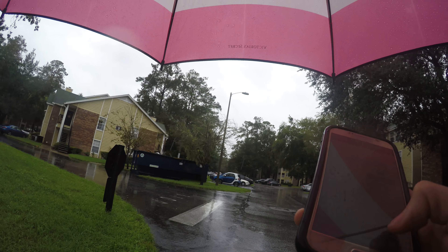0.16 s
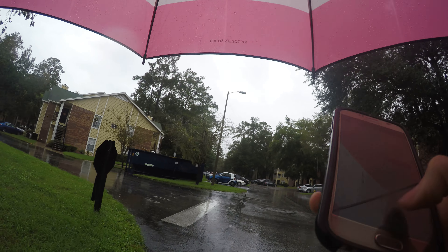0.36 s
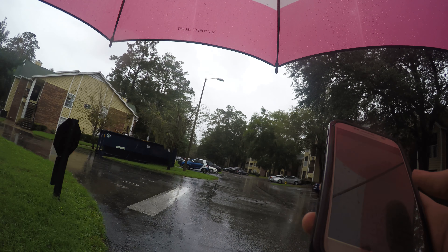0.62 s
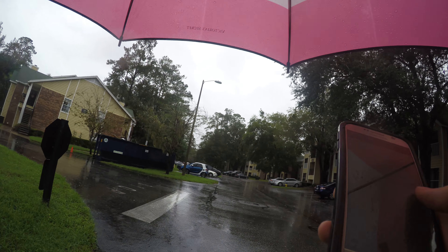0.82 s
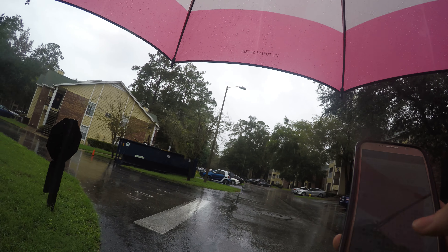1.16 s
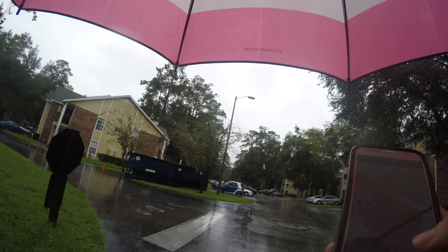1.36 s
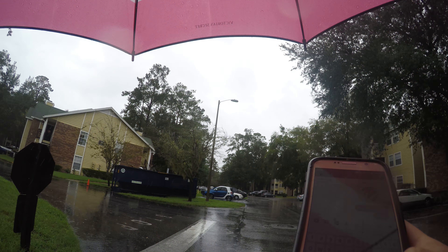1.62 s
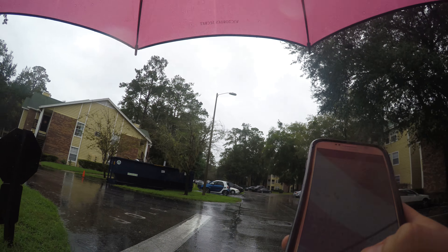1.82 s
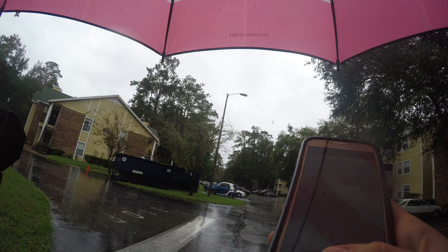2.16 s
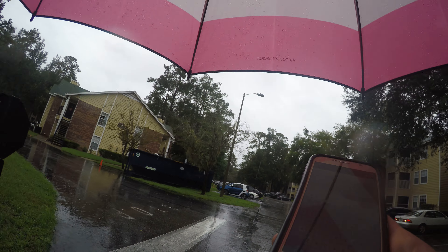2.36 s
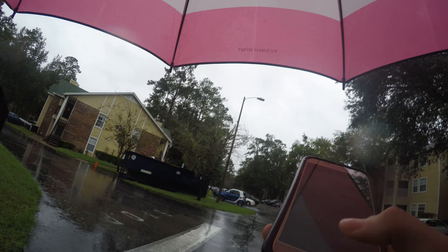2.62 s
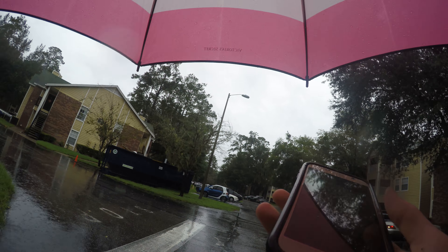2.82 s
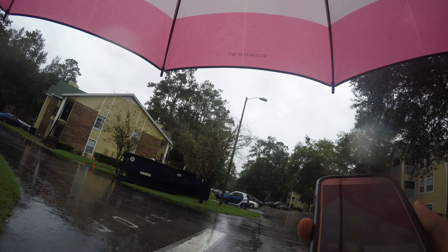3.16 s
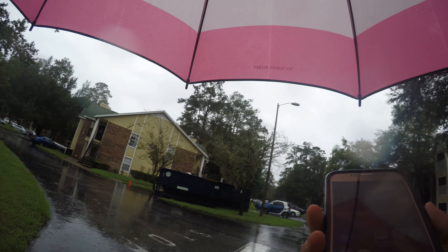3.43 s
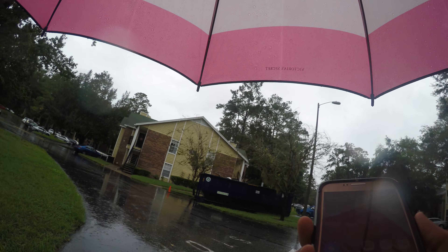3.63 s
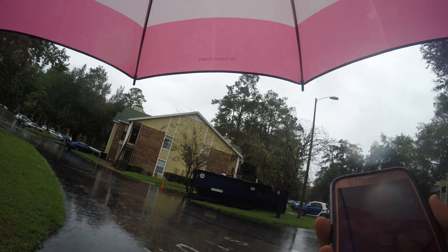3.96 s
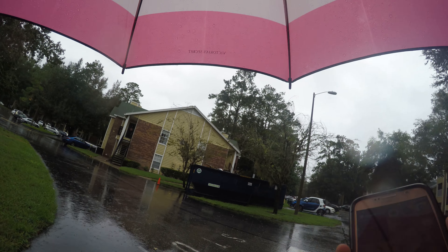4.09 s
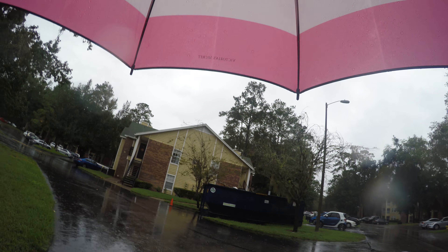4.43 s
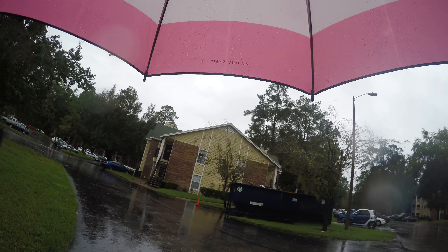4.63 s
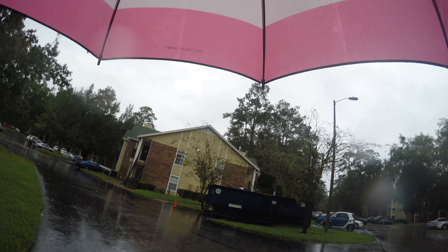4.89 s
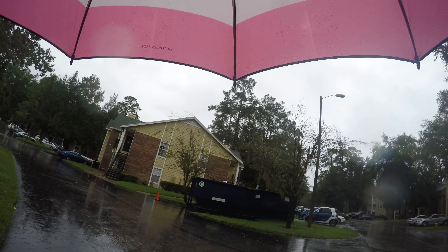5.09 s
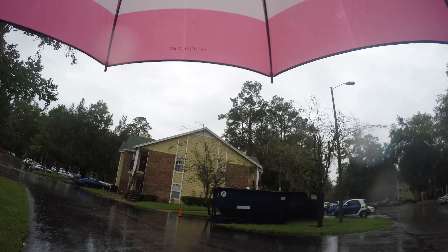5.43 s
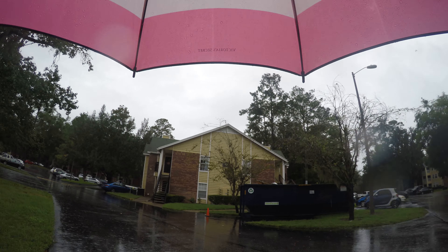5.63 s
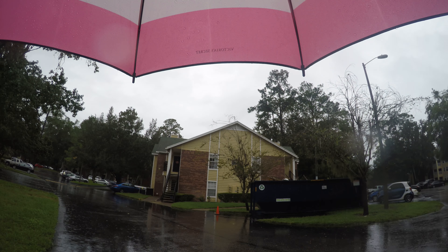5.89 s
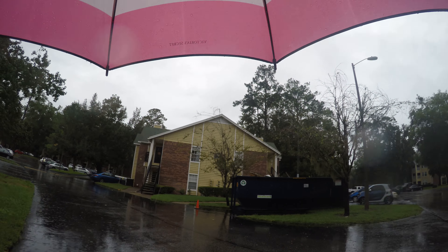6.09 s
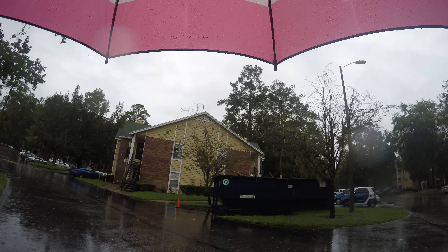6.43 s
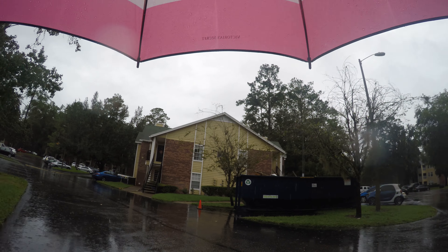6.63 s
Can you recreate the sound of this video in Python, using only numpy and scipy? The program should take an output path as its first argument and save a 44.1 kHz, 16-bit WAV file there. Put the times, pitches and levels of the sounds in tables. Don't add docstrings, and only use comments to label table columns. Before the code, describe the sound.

Raindrops tap irregularly on a taut umbrella overhead, over soft rain hiss and low wind buffeting, with hand rubbing and one loud plastic snap near the end.

```python
import sys
import numpy as np
from scipy import signal
from scipy.fft import rfft, irfft, next_fast_len
from scipy.io import wavfile
from scipy.ndimage import map_coordinates

SR = 44100
rng = np.random.default_rng(int(sys.argv[2]) if len(sys.argv) > 2 else 0)


def wrap_up_sound(samples):
    columns = np.atleast_2d(samples).T
    tamed = np.clip(columns, -1, 1)
    steps = np.round(tamed * 32767).astype(np.int16)
    wavfile.write(sys.argv[1], SR, steps)


def how_loud(loudness_db):
    steps = np.asarray(loudness_db, float) / 20
    return 10 ** steps


N = 298116


def unit(x):
    return x / np.sqrt(np.mean(x ** 2) + 1e-20)


def curves(rows):
    s, *cols = np.transpose(rows)
    return [np.interp(np.arange(N) / SR, s, c) for c in cols]


def wobble(rate_hz):
    knots = rng.standard_normal(int(N * rate_hz / SR) + 4)
    return map_coordinates(knots, [np.arange(N) * rate_hz / SR])


def filtered(x, response):
    m = next_fast_len(N + SR // 2)
    return irfft(rfft(x, m) * response(np.fft.rfftfreq(m, 1 / SR)), m)[:N]


def modal(modes):
    def response(f):
        total = 0
        for k, (centre, width, db) in enumerate(modes):
            damping = 1j * f * width
            total = total + (-1) ** k * how_loud(db) * damping / (centre * centre - f * f + damping)
        return total
    return response


def resonate(x, modes):
    return filtered(x, modal(modes))


def noise(spectrum):
    f, db = np.transpose(spectrum)
    white = rng.standard_normal(N)
    return unit(filtered(white, lambda hz: how_loud(np.interp(np.log(hz + 1), np.log(f + 1), db))))


def bursts(times, gains, shapes):
    at = np.round(times * SR).astype(int)[:, None] + np.arange(shapes.shape[1])
    return np.bincount(at.ravel(), (gains[:, None] * shapes).ravel(), N + SR)[:N]


# centre [Hz], width [Hz], level [dB]
DRUM_MODES = [(1092, 167, 7), (324, 396, -8.5)]
# centre [Hz], width [Hz], level [dB]
CAVITY_MODES = [(1494, 390, -4.5), (2330, 190, 7.5), (2730, 264, 2.5)]
# centre [Hz], width [Hz], level [dB]
SPLASH_MODES = [(3220, 200, -2.5), (3883, 253, 8), (4630, 470, -4.5), (5810, 720, -5.5),
                (7560, 1900, -15.5)]


def impacts(start_s, drum_db, cavity_db, splash_db, t60):
    size = 640
    t, hz = np.arange(384) / SR, np.fft.rfftfreq(size, 1 / SR)
    draw = rng.standard_normal((len(start_s), len(t) + 2))
    life = t60 * np.exp(0.75 * draw[:, :1])
    detune = np.exp(0.048 * draw[:, 1:2])
    decay = how_loud(-60 * t / .004) + .3 * how_loud(-60 * t / life)
    rise = 1 - np.exp(-t / .0001)
    taps = rfft(draw[:, 2:] * decay * rise, size)
    dull = 1 / (1 + 1j * hz / 9000)
    shapes = 0
    for modes, db in [(DRUM_MODES, drum_db), (CAVITY_MODES, cavity_db), (SPLASH_MODES, splash_db)]:
        ring = irfft(taps * dull * modal(modes)(hz * detune))
        shapes = shapes + how_loud(db)[:, None] * ring / np.linalg.norm(ring, axis=1, keepdims=True)
    return bursts(start_s, np.ones(len(start_s)), shapes)


# start_s [s], drum_db [dB], cavity_db [dB], splash_db [dB]
LARGE_DROPS = [(0.0464, -19.5, -13.5, -20.5), (0.2137, -19, -12.5, -28), (0.604, -38, -16, -24),
               (1.2517, -16.5, -13, -34), (1.443, -15, -15, -26), (2.0119, -19, -20, -22),
               (2.0204, -16, -19, -26), (2.154, -16, -20, -23.5), (2.2281, -16.5, -23, -17),
               (2.3882, -11.5, -11.5, -24), (2.9156, -12, -16, -24), (2.9879, -17, -15, -22),
               (3.0375, -18, -14, -29), (3.1484, -17, -19, -34), (3.2976, -12.5, -19, -19.5),
               (3.3186, -20, -17, -32), (3.5274, -15, -16.5, -33), (3.7978, -14, -14, -33),
               (3.915, -15, -27, -22.5), (4.2716, -17.5, -18, -25), (4.299, -14.5, -24, -21),
               (4.3609, -20, -16, -28), (4.4244, -20, -15, -29), (4.6014, -19, -13, -37),
               (4.839, -42, -12, -27), (4.8999, -19, -1.5, -27), (4.946, -21, -10.5, -24),
               (5.026, -16, -11.5, -26), (5.4084, -19, -3, -25), (6.6, -14, -13, -29)]
# start_s [s], strength_db [dB]
PANEL_DROPS = [(.0702, -23), (.356, -13), (.4711, -12), (.758, -13.5), (.9532, -14), (1.2459, -13.5),
               (1.5315, -15.5), (1.561, -16), (1.9038, -17), (1.9642, -13), (2.0634, -19.5),
               (2.2798, -17.5), (2.4665, -18), (3.0074, -25), (3.16, -14), (3.1832, -16), (3.326, -16.5),
               (3.4217, -15.5), (3.735, -16), (4.003, -15.5), (4.487, -16.5), (4.6178, -14.5),
               (5.088, -14.5), (6.2391, -17), (6.3372, -17), (6.3803, -12), (6.4757, -14.5), (6.6476, -14),
               (6.6729, -18), (6.7044, -17)]
# start_s [s], strength_db [dB]
RIB_DROPS = [(.6192, -21), (.626, -18.5), (.7132, -22), (1.0339, -16.5), (1.2639, -20), (1.3101, -19),
             (1.404, -22), (1.8166, -16.5), (2.1417, -20), (2.621, -18), (2.7509, -19.5), (2.7962, -23),
             (3.0613, -17), (3.1005, -15.5), (3.1184, -17), (3.465, -18), (3.7282, -20.5), (3.8794, -22),
             (3.8931, -16), (4.0584, -18), (4.0844, -18), (4.2566, -16), (4.4526, -22), (4.5345, -20),
             (4.558, -16), (4.891, -20.5), (5.0199, -24), (5.3211, -21.5), (5.542, -21), (6.5881, -19)]
# start_s [s], strength_db [dB]
RIM_DROPS = [(.685, -22.5), (.7215, -20.5), (.941, -26.5), (1.329, -20), (1.5077, -26), (1.6558, -21.5),
             (1.722, -25), (2.054, -21), (2.107, -21.5), (2.4324, -26), (2.5133, -24), (2.5929, -21),
             (2.6631, -25), (2.9573, -24), (3.133, -19), (3.514, -20.5), (3.6714, -26), (3.9382, -22),
             (3.974, -19.5), (4.0326, -20), (4.0971, -19), (4.1837, -22.5), (4.288, -28), (4.43, -19.5),
             (4.6403, -20), (5.3565, -25), (6.0371, -21.5), (6.176, -21.5), (6.4986, -20), (6.7195, -19.5)]
# start_s [s], strength_db [dB]
SMALL_DROPS = [(.0604, -17.5), (.4032, -27), (.487, -21), (.7504, -19), (.8191, -21), (.8658, -20),
               (.888, -22), (1.1545, -28), (1.2308, -21), (1.3543, -26), (1.4128, -23), (1.4883, -19),
               (1.6466, -27), (1.691, -23), (1.8742, -18.5), (2.0958, -20.5), (2.2716, -17.5),
               (2.3985, -20.5), (2.8208, -26), (3.1137, -17), (3.6066, -22), (3.6466, -17), (3.6957, -19),
               (3.7511, -23.5), (3.9944, -19), (4.2641, -21), (4.5121, -23), (5.491, -26), (6.5304, -21.5),
               (6.6247, -18)]


def drops():
    # drum, cavity and splash dB over the strength
    places = [(PANEL_DROPS, (-2.5, -8, -13)), (RIB_DROPS, (-3.5, 0.5, -10.5)),
              (RIM_DROPS, (-1, 1, -1)), (SMALL_DROPS, (-1.5, -1, -9))]
    usual = np.array([(s, *np.add(db, colour)) for rows, colour in places for s, db in rows])
    usual[:, 1:] += 2.5 * rng.standard_normal((len(usual), 3))
    start_s, drum_db, cavity_db, splash_db = np.vstack([LARGE_DROPS, usual]).T
    return impacts(start_s - .0004, drum_db - 3.5, cavity_db - 7.0, splash_db - 4.5, t60=0.015)


# start_s [s], level_db [dB]
PATTER_LEVEL = [(0.0, -54.5), (0.96, -54.5), (2.01, -52.5), (2.7, -59), (3.12, -51.5), (3.86, -53),
                (5.25, -52.5), (5.6, -51), (5.95, -45.5), (6.14, -61), (6.34, -59.5), (6.76, -52)]


def patter():
    draw = rng.random((1300, 5))
    place = draw[:, 0] * N
    cluster_db = 3.2 * wobble(16)[place.astype(int)]
    size_db = np.minimum(-4.5 * np.log(draw[:, 1]), 9) + cluster_db
    drum_db, cavity_db, splash_db = size_db + 14 * (draw[:, 2:].T - .5)
    fine = impacts(place / SR, drum_db - .5, cavity_db, splash_db - 5.0, t60=0.026)
    return how_loud(curves(PATTER_LEVEL)[0] - 1.0) * unit(fine)


# start_s [s], level_db [dB], pitch_hz [Hz], width_hz [Hz]
SHELL_PINGS = [
    (.604, -26, 2700, 300),
    (1.4427, -26, 3300, 400),
    (1.781, -41, 10600, 1200),
    (4.4244, -39, 7200, 1500),
    (5.7487, -16, 9700, 1600),
]


def pings():
    puffs = rng.standard_normal((len(SHELL_PINGS), 256)) * how_loud(-60 * np.arange(256) / SR / 0.0075)
    total = 0
    for (start_s, level_db, pitch_hz, width_hz), puff in zip(SHELL_PINGS, puffs):
        tap = bursts(np.array([start_s]), how_loud([level_db]), puff[None])
        total = total + resonate(tap, [(pitch_hz, width_hz, 0)])
    return total


def strokes(rows, swell):
    power = np.zeros(N + SR)
    for start_s, length_s, level_db in rows:
        phase = np.linspace(0, 1, round(length_s * SR)) ** 0.66
        arch = np.abs(np.sin(np.pi * phase))
        power[round(start_s * SR):][:len(arch)] += (arch ** swell * how_loud(level_db)) ** 2
    return np.sqrt(power[:N])


# start_s [s], length_s [s], pressure_db [dB], edge_db [dB over the pressure]
HAND_STROKES = [(4.833, 0.022, -51, 1), (4.894, 0.042, -35, -10), (4.94, 0.038, -49, -11),
                (5.405, 0.023, -44.5, -9.5), (5.438, 0.055, -41, -16.5), (5.536, .045, -46, -15.5),
                (5.582, 0.075, -42, -16), (5.615, .06, -36.5, -12.5), (5.657, 0.061, -37, -16.5),
                (5.69, 0.055, -43, -18), (5.717, 0.081, -29, -11.5), (5.73, 0.11, -32, -8.5),
                (5.838, 0.13, -32.5, -9.5), (5.898, 0.073, -34, -20), (5.922, 0.088, -34, -14)]
# start_s [s], length_s [s], pressure_db [dB]
FINGER_STROKES = [
    (3.795, 0.029, -43),
    (3.81, 0.053, -37),
]
# centre [Hz], width [Hz], level [dB]
SHELL_LOW = [(1360, 560, -8.5), (1798, 107, 3), (2245, 250, 0), (2770, 286, -1)]
# centre [Hz], width [Hz], level [dB]
SHELL_HIGH = [(3620, 430, 4), (4690, 300, 8), (5690, 300, 5), (6530, 480, 0), (8600, 950, -5.5),
              (13700, 4000, -20)]
# centre [Hz], width [Hz], level [dB]
SQUEAK_MODES = [(1980, 250, 7.5), (2960, 530, -5), (3800, 320, -5), (5820, 240, -8.5), (6500, 900, -26),
                (7300, 330, -21)]


def rubs():
    grain = rng.standard_normal(N) * how_loud(2.14 * wobble(500) + 0.56 * wobble(120))
    low = unit(resonate(resonate(grain, SHELL_LOW), [(2330, 2500, 0)]))
    high = unit(resonate(grain, SHELL_HIGH))
    squeak = unit(resonate(resonate(grain, SQUEAK_MODES), [(3000, 6000, 0)]))
    body = strokes([(s, length, db) for s, length, db, edge_db in HAND_STROKES], swell=1)
    edge = strokes([(s, length, db + edge_db + 2.0) for s, length, db, edge_db in HAND_STROKES], swell=2.4)
    return body * low + edge * high + strokes(FINGER_STROKES, swell=1) * squeak


# start_s [s], level_db [dB], crack_db [dB]
CATCH_BLOWS = [
    (6.0731, 4, 2.5),
    (6.0837, -21, -32),
    (6.0884, -21.5, -25.5),
    (6.8, -27, -12),
]
# centre [Hz], width [Hz], level [dB]
CLICK_MODES = [(1410, 170, -13.5), (1778, 113, -7.5), (2190, 112, -1.5), (2500, 276, -2.5), (2825, 240, -5),
               (3390, 350, -9), (3950, 150, -15), (5373, 300, -12.5)]
# pitch_hz [Hz], level_db [dB], t60_s [s]
CATCH_RING = [(1633, -0.5, 0.041), (1910, -15, 0.092), (2098, -4.5, 0.13), (2240, -8.5, 0.1),
              (2500, -14.5, 0.052), (4300, -24.5, .05)]
# centre [Hz], width [Hz], level [dB]
CRACK_MODES = [(4500, 1500, 1), (8200, 3000, -9.5), (10600, 1700, -9.5), (14300, 2500, -13)]


def catch():
    t = np.arange(SR // 4) / SR
    start_s, level_db, crack_db = np.transpose(CATCH_BLOWS)
    blow = np.hanning(9)[None]
    click = resonate(bursts(start_s, how_loud(level_db + 27), blow), CLICK_MODES)
    ring = sum(how_loud(db - 19.5 - 60 * t / t60) * np.sin(2 * np.pi * hz * t) for hz, db, t60 in CATCH_RING)
    rings = bursts(start_s, how_loud(level_db), ring[None])
    puff = rng.standard_normal((len(start_s), len(t))) * how_loud(crack_db[:, None] - 4.0 - 60 * t / 0.006)
    crack = resonate(bursts(start_s, how_loud(level_db), puff), CRACK_MODES)
    return filtered(click + rings + crack, lambda hz: 1j * hz / (1200 + 1j * hz))


# start_s [s], peak_db [dB], pitch_hz [Hz], puff_db [dB]
KNOCKS = [(0.4627, -29, 140, -10), (2.387, -44, 120, -5), (2.914, -44, 120, -7), (3.299, -40, 100, -1.5),
          (3.32, -30, 39.5, -16), (3.8003, -24, 74.6, -26), (4.897, -34, 90, -6), (5.113, -29.5, 48.5, -6),
          (5.408, -32.5, 70, -17), (5.615, -32.5, 45, -30), (5.732, -27.5, 59, -12)]


def bumps():
    start_s, peak_db, pitch_hz, puff_db = np.transpose(KNOCKS)
    t, hz = np.arange(2048) / SR, pitch_hz[:, None]
    swing = -np.sin(2 * np.pi * hz * t) * how_loud(-60 * t * hz / 2.6) * (1 - np.exp(-t / 0.00054))
    puff = rng.standard_normal(swing.shape) * how_loud(-60 * t / 0.032)
    puffs = bursts(start_s, how_loud(peak_db + puff_db + 24.5), puff)
    dull = resonate(resonate(puffs, [(323, 360, 0)]), [(317, 260, 0)])
    return bursts(start_s, how_loud(peak_db + 10.5), swing) + dull


# start_s [s], level_db [dB]
GUSTS = [(0.0, -28), (0.09, -47), (0.43, -36.5), (0.75, -42.5), (1.0, -32.5), (1.07, -42), (2.14, -39.5),
         (2.48, -51.5), (2.73, -37.5), (3.01, -43), (3.41, -37.5), (3.69, -49), (3.85, -39), (4.63, -43.5),
         (5.35, -41.5), (5.74, -31.5), (6.19, -45.5), (6.76, -40.5)]
# pitch_hz [Hz], level [dB per Hz]
BUFFET_SPECTRUM = [(8.8, -39), (15, 5.5), (34, -5), (45, -4), (81, -19), (120, -21.5), (160, -36),
                   (260, -120)]
# pitch_hz [Hz], level [dB per Hz]
FLUTTER_SPECTRUM = [(35, -18.5), (60, -2), (81, -4.5), (198, -9), (228, -9.5), (497, -24.5), (800, -47.5),
                    (1040, -66), (1760, -120)]


def wind():
    gust_db, = curves(GUSTS)
    buffet = unit(how_loud(1.5 * wobble(20)) * noise(BUFFET_SPECTRUM)) * how_loud(2.0)
    flutter = unit(how_loud(3.3 * wobble(40) + 0.76 * wobble(4.1)) * noise(FLUTTER_SPECTRUM))
    flutter_db = -50.5 + 0.28 * (gust_db - gust_db.mean())
    return how_loud(gust_db) * buffet + how_loud(flutter_db) * flutter


# pitch_hz [Hz], level [dB per Hz]
RAIN_SPECTRUM = [(240, -38), (400, -8), (745, -9), (1100, -1), (1970, -11), (2290, -2), (3010, -12),
                 (3890, -10), (4960, -20), (8060, -28), (15000, -33)]
# pitch_hz [Hz], level [dB per Hz]
MICROPHONE_SPECTRUM = [(2000, -12), (5000, 0), (8000, -3), (15000, -7)]


def far_rain():
    road = how_loud(-55.0 - 5.0 + 2.3 * wobble(2.45)) * noise(RAIN_SPECTRUM)
    return road + how_loud(-70.0) * noise(MICROPHONE_SPECTRUM)


# pitch_hz [Hz], level_db [dB]
WHINE_TONES = [(7348, -78), (14702, -74.5)]


def whine():
    cycle_hz, cycle_s = 14.98, .0635
    t = np.arange(N) / SR
    gate = np.clip(.6 + 3 * np.cos(2 * np.pi * cycle_hz * (t - cycle_s)), .1, 1)
    drift = .35 * wobble(300)
    tones = 0
    for k, (hz, db) in enumerate(WHINE_TONES):
        tones = tones + how_loud(db) * np.sin(2 * np.pi * hz * t + (k + 1) * drift)
    return gate * tones


def scene():
    rain = drops() + patter() + far_rain()
    handling = bumps() + rubs() + catch() + pings()
    return (rain + wind() + handling + whine())[None]


def low_pass(x):
    return signal.sosfilt(signal.butter(12, 15630, fs=SR, output="sos"), x)


def record(dry):
    top_hz = 15200
    heard = filtered(dry[0], lambda hz: 1 / (1 + (hz / top_hz) ** 80))[None]
    clipped = heard / (1 + np.abs(heard) ** 12) ** (1 / 12)
    return low_pass(clipped)


dry = scene()
out = record(dry)
wrap_up_sound(out)
```